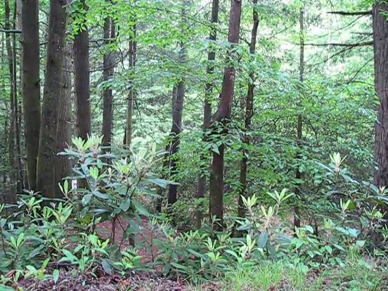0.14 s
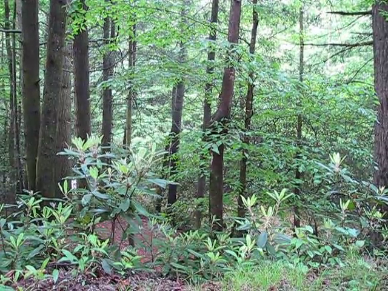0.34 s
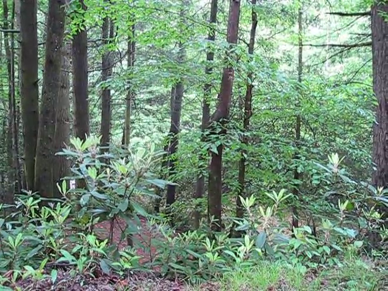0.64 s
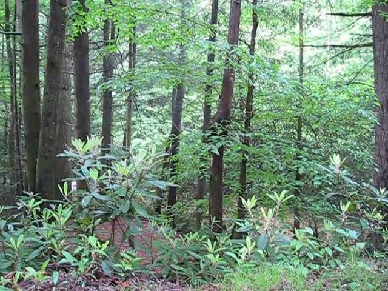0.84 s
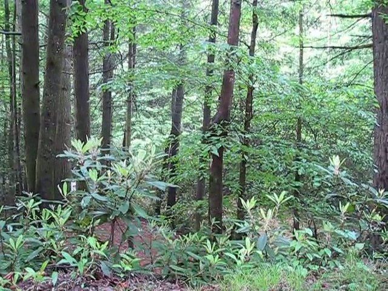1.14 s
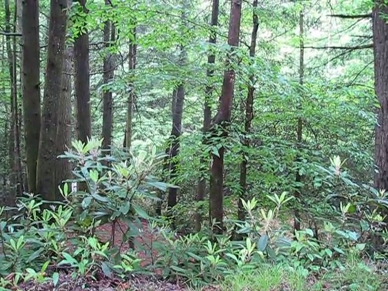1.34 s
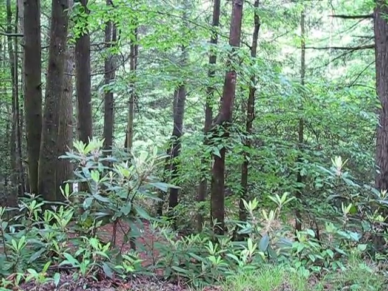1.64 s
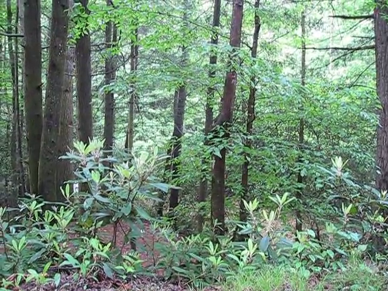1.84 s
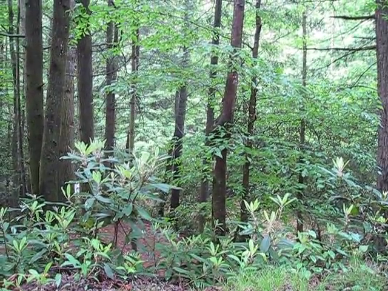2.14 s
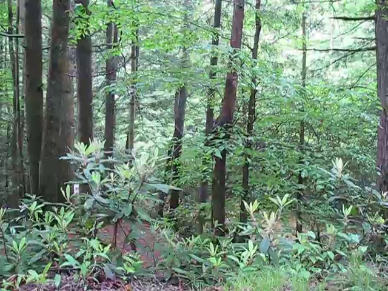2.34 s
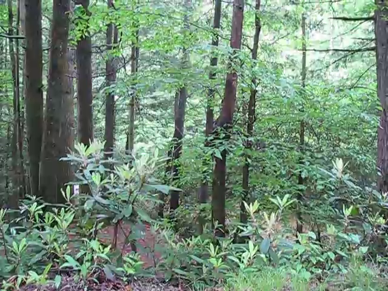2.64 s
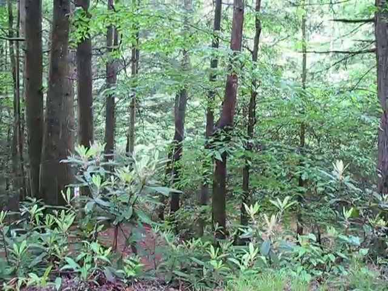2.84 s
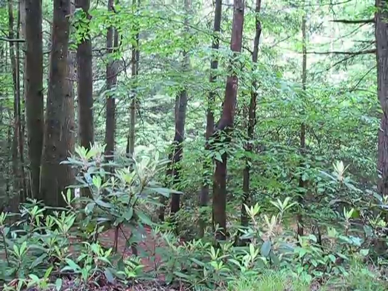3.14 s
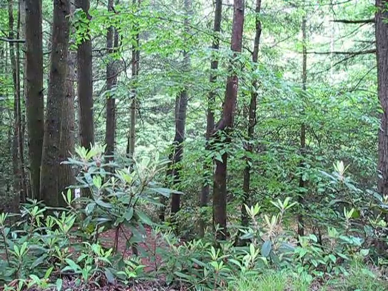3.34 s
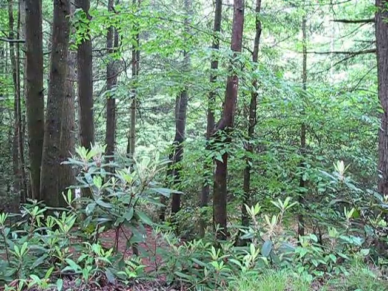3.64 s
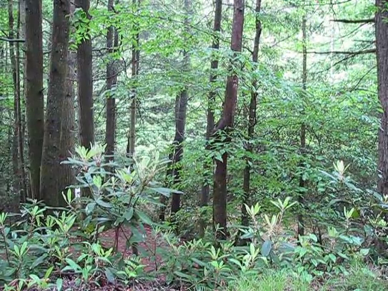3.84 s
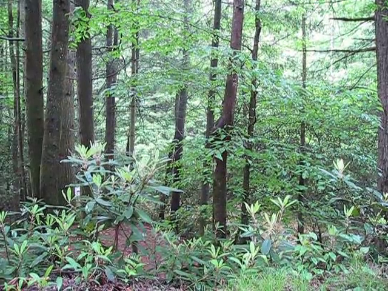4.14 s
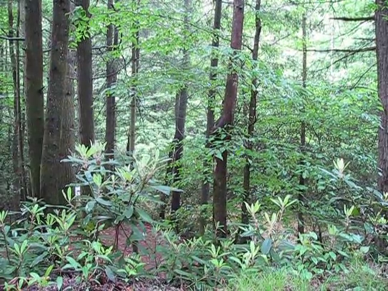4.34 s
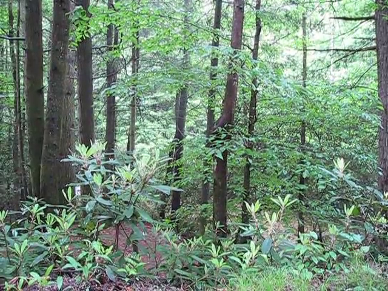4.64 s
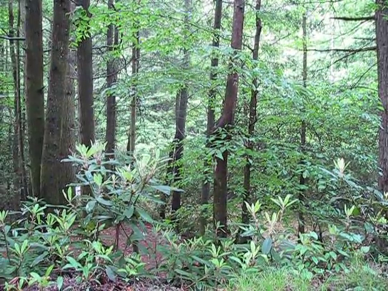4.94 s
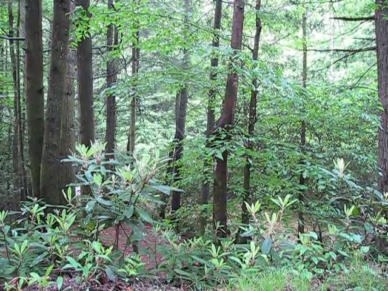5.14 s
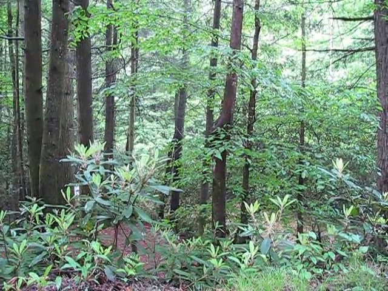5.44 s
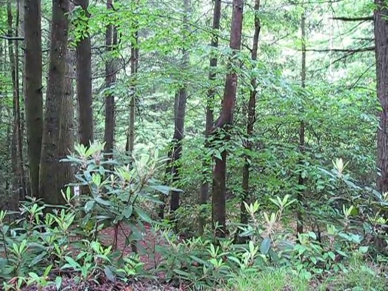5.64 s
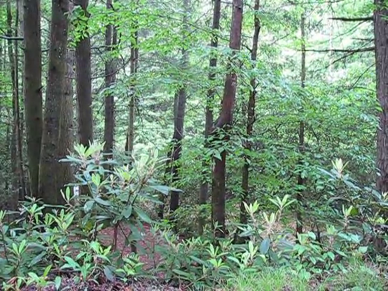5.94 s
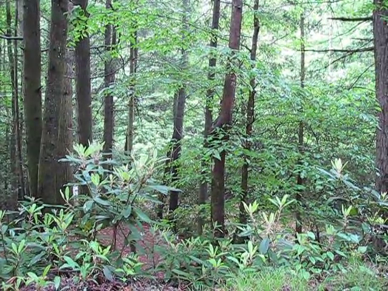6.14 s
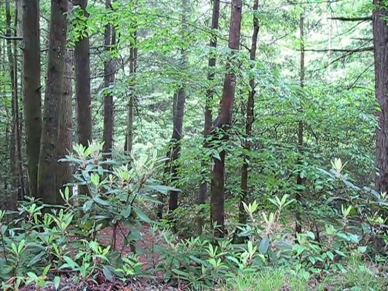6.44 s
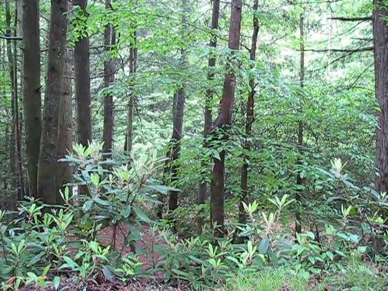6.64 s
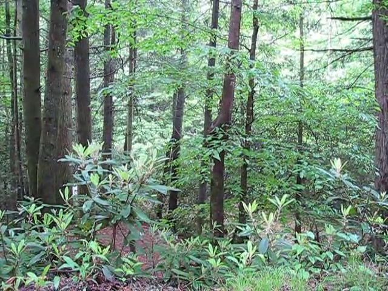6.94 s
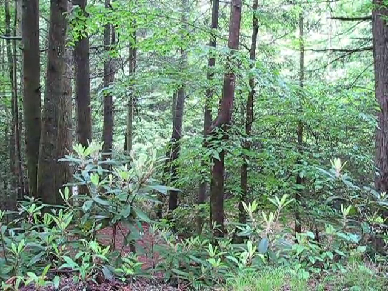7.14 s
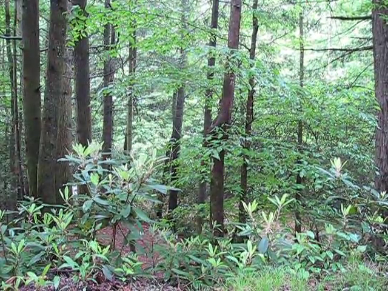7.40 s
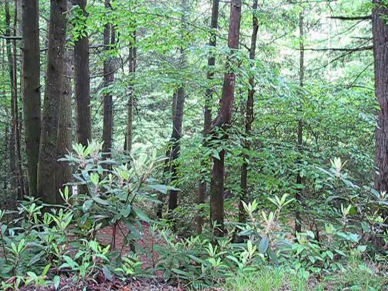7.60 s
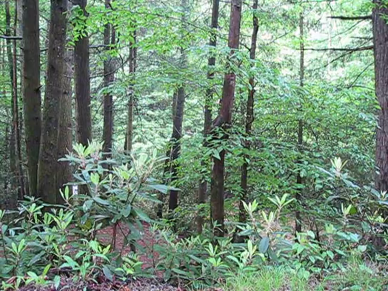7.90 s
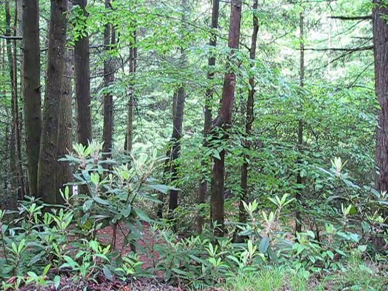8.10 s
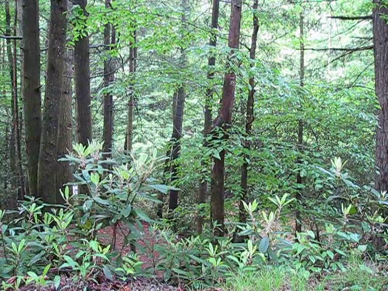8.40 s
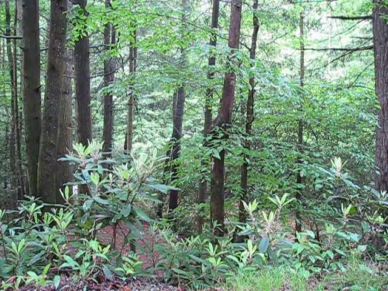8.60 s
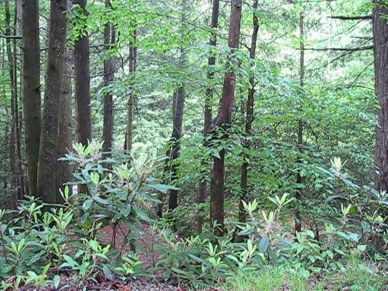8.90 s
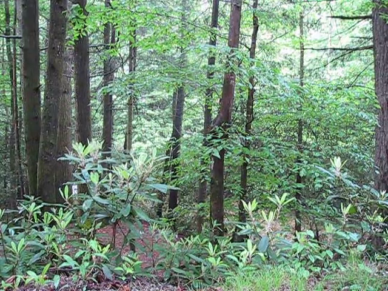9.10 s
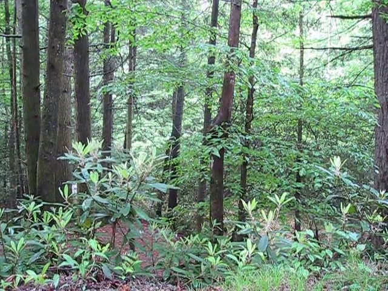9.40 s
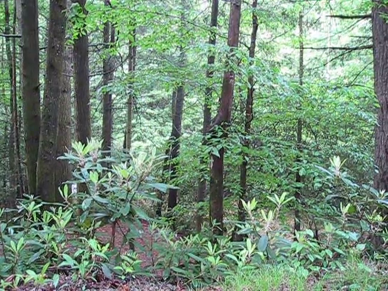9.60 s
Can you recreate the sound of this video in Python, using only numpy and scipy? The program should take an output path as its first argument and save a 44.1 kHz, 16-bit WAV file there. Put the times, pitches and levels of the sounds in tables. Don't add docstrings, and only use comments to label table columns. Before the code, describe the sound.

Steady river rush in a forest, far birds whistling faintly, then a close warbler sings one bright slurred phrase ending in rapid chips.

```python
import sys
import numpy as np
from scipy import signal
from scipy.fft import rfft, irfft
from scipy.io import wavfile
from scipy.ndimage import uniform_filter1d

SR = 44100
rng = np.random.default_rng(int(sys.argv[2]) if len(sys.argv) > 2 else 0)


def gain_from_db(level_db):
    decades = np.asarray(level_db, float) / 20
    return 10 ** decades


def master_out(mix):
    frames = np.transpose(np.atleast_2d(mix))
    ceiling = np.clip(frames, -1, 1)
    pcm = np.round(ceiling * 32767).astype(np.int16)
    wavfile.write(sys.argv[1], SR, pcm)


N = 430416


def walk(rate_hz):
    hold = int(SR / rate_hz)
    steps = np.repeat(rng.standard_normal(N // hold + 1), hold)
    return 0.85 * uniform_filter1d(uniform_filter1d(steps, hold), hold)[:N]


def noise(spectrum):
    hz = np.maximum(np.arange(N // 2 + 1) * SR / N, 1)
    at_hz, db = np.transpose(spectrum)
    colour = gain_from_db(np.interp(np.log(hz), np.log(at_hz), db))
    return hz, rfft(rng.standard_normal(N)) * colour


# f/Hz, level/dB per Hz
RIVER_COLOUR = [(30, -35), (90, -30), (280, -15), (660, -6.5), (1270, -9.5), (1750, -6.5), (3000, -4.5),
                (3700, 0), (4400, -8), (7200, -21), (8400, -23.5), (9500, -35.5), (12500, -39),
                (14800, -58)]
# t/s, level/dB
RIVER_FLOW = [
    (0.0, -37.5),
    (0.2, -38),
    (0.87, -37.5),
    (2.22, -38),
    (7.05, -38),
    (7.3, -38),
]


def river():
    hz, rush = noise(RIVER_COLOUR)
    splash_db = .6 * walk(120) + .25 * walk(8)
    out = 0
    for centre_hz in 30 * 2. ** np.arange(10):
        octaves_away = np.clip(np.log2(hz / centre_hz), -1, 1)
        band = np.cos(np.pi / 2 * octaves_away) ** 2
        swell_db = .3 * walk(3) + .45 * walk(14)
        out = out + irfft(rush * band, N) * gain_from_db(splash_db + swell_db)
    flow_db = np.interp(np.arange(N) / SR, *np.transpose(RIVER_FLOW))
    river_over_mid_db = 11.5
    return out / np.std(out) * gain_from_db(flow_db + river_over_mid_db)


# deepest from t/s, hold t/s, depth level/dB
GAIN_BITES = [
    (7.542, .005, 5),
    (7.744, 0.035, 6.5),
    (7.987, 0.044, 6.5),
    (8.223, .015, 3.5),
]


def recorder_gain_db():
    t = np.arange(N) / SR
    bite_s, let_go_s = .04, 0.08
    pulled_db = 0
    for start, hold, depth_db in GAIN_BITES:
        biting = 1 + (t - start) / bite_s
        letting_go = 1 - (t - start - hold) / let_go_s
        pulled_db = pulled_db + depth_db * np.clip(np.minimum(biting, letting_go), 0, 1)
    return -pulled_db


def shape(rows, bend, swell_db, peak, fade_db):
    u = np.linspace(0, 1, num=17)
    slide = (1 - np.exp(-bend * u)) / (1 - np.exp(-bend))
    before_peak = np.clip(1 - u / peak, 0, 1)
    after_peak = np.clip((u - peak) / (1 - peak), 0, 1)
    breath_db = -swell_db * before_peak ** 2 - fade_db * after_peak ** 2
    notes = []
    for row in rows:
        start, length, from_hz = row[:3]
        to_hz, level_db = row[-2:]
        hz = from_hz + (to_hz - from_hz) * slide
        notes.append(np.transpose([start + length * u, hz, level_db + breath_db]))
    return notes


def sing(notes, edge_s, flutter_db, flutter_hz, wobble):
    out = np.zeros(N)
    flutter = gain_from_db(flutter_db * walk(flutter_hz))
    waver = 1 + wobble * walk(90)
    for note in notes:
        s, hz, db = np.transpose(note)
        at = np.arange(max(int((s[0] - edge_s) * SR), 0), int((s[-1] + edge_s) * SR))
        t = at / SR
        edges = np.clip(np.minimum(t - s[0], s[-1] - t) / edge_s + .5, 0, 1)
        phase = 2 * np.pi * np.cumsum(np.interp(t, s, hz) * waver[at]) / SR
        out[at] += np.sqrt(2) * gain_from_db(np.interp(t, s, db)) * edges ** 2 * np.sin(phase)
    return out * flutter * gain_from_db(-recorder_gain_db())


def trunks(x, direct_db, near_db, far_db, t60_s, leaves_ms):
    t = np.arange(SR) / SR
    cluster = rng.standard_normal(SR) * gain_from_db(-60 * t / .16) * (t > .002)
    wash_db = 2 * walk(60)[:SR] - 60 * t / t60_s
    wash = rng.standard_normal(SR) * gain_from_db(wash_db) * np.clip(t / .03, 0, 1)
    echoes = gain_from_db(near_db) * cluster / np.sqrt(np.sum(cluster ** 2))
    echoes = echoes + gain_from_db(far_db) * wash / np.sqrt(np.sum(wash ** 2))
    at = np.arange(N)
    blurred = np.interp(at + leaves_ms / 1000 * SR * walk(300), at, x)
    return gain_from_db(direct_db) * x + signal.fftconvolve(blurred, echoes)[:N]


# start t/s, length t/s, f/Hz, level/dB
LOW_NOTES = [(0, .1, 3880, -26), (.115, .075, 3870, -22), (.21, .085, 3875, -32), (3.3, 0.26, 3916, -35),
             (3.552, .085, 3860, -21.5), (3.65, .095, 3895, -23), (3.755, 0.061, 3830, -25.5),
             (3.815, 0.14, 3865, -33.5), (7.31, 0.15, 3885, -29), (7.422, 0.15, 3896, -29.5),
             (7.65, 0.068, 3930, -32), (7.85, 0.17, 3985, -32)]
# start t/s, length t/s, f/Hz, level/dB
LOW_REPLIES = [
    (0.551, 0.026, 3350, -25.5),
    (.628, 0.027, 3365, -29),
    (4.206, 0.15, 3436, -29),
    (4.35, .13, 3384, -30.5),
    (7.869, .11, 3395, -33),
    (8.006, 0.089, 3390, -35),
]


def low_whistler():
    notes = shape(LOW_NOTES + LOW_REPLIES, bend=1, swell_db=6, peak=.3, fade_db=6)
    song = sing(notes, edge_s=.016, flutter_db=2.6, flutter_hz=35, wobble=.0015)
    return trunks(song, direct_db=0, near_db=-14, far_db=-13, t60_s=1., leaves_ms=.02)


# start t/s, length t/s, from f/Hz, to f/Hz, level/dB
DISTANT_SCRAPS = [(0, 0.12, 3560, 3500, -26), (.335, .04, 3650, 3940, -22), (1.3, .12, 2800, 3020, -31),
                  (1.36, 0.038, 3770, 3600, -21), (2.25, .08, 4900, 4500, -32),
                  (2.36, .11, 3500, 4250, -23), (2.49, 0.086, 3840, 2770, -28.5),
                  (3.97, 0.062, 3630, 3516, -25), (5.44, .07, 3960, 4800, -40),
                  (5.52, .04, 3530, 2940, -30), (5.58, .05, 3700, 4100, -32)]


def distant_warbler():
    notes = shape(DISTANT_SCRAPS, bend=.6, swell_db=1.5, peak=.4, fade_db=2.5)
    song = sing(notes, edge_s=.015, flutter_db=4, flutter_hz=60, wobble=.008)
    return trunks(song, direct_db=-13, near_db=-9, far_db=-9, t60_s=.6, leaves_ms=.07)


# start t/s, length t/s, from f/Hz, to f/Hz, level/dB
HIGH_NOTES = [(.31, 0.19, 6370, 6140, -34), (3.0, 0.18, 6800, 6500, -43.5), (3.26, 0.31, 6650, 6300, -41.5),
              (3.65, .24, 6730, 6530, -43), (3.915, .27, 6400, 6100, -35), (7.02, .28, 6830, 6400, -41.5),
              (7.36, .14, 6900, 6400, -43), (7.635, .11, 6400, 6260, -35.5), (7.8, 0.093, 6170, 6200, -38),
              (7.815, 0.037, 5780, 5780, -33), (8.08, .11, 6570, 6530, -43),
              (8.27, 0.041, 6430, 6530, -48.5)]


def high_singer():
    notes = shape(HIGH_NOTES, bend=3, swell_db=2.5, peak=.3, fade_db=3)
    song = sing(notes, edge_s=.02, flutter_db=3.5, flutter_hz=60, wobble=0.00685)
    return trunks(song, direct_db=-3.5, near_db=-8, far_db=-3.0, t60_s=1.05, leaves_ms=0.029)


# start t/s, length t/s, from f/Hz, to f/Hz, level/dB
SLURS_LEVELLING = [
    (6.878, .058, 5100, 5020, -33),
    (7.686, 0.081, 5080, 4600, -14.5),
    (7.768, 0.045, 4580, 5220, -20.5),
    (7.82, .115, 5130, 5285, -24.5),
    (7.945, .105, 4986, 4127, -15),
]
FIRST_WHISTLE = [
    (7.083, .16, 6090, 4826, -16.5),
]
SECOND_WHISTLE = [
    (7.386, .185, 6105, 4710, -16.5),
]
FALLING_HOOKS = [
    (8.352, 0.0592, 4000, 3340, -17.5),
    (8.583, .018, 6840, 4840, -19.5),
]
CLOSING_CHIPS = [
    (8.501, 0.015, 3980, 3980, -11),
    (8.529, 0.013, 4020, 3860, -15),
    (8.545, .014, 3860, 3650, -16.5),
    (8.559, .022, 3980, 3890, -18),
    (8.601, 0.037, 4890, 4980, -20),
    (8.642, .016, 4900, 3950, -26),
]


def near_warbler():
    slurs = (shape(FIRST_WHISTLE, bend=.6, swell_db=14, peak=0.95, fade_db=12)
             + shape(SECOND_WHISTLE, bend=1.2, swell_db=17, peak=0.24, fade_db=3.5)
             + shape(SLURS_LEVELLING, bend=1.22, swell_db=-3.0, peak=.2, fade_db=2))
    chips = (shape(FALLING_HOOKS, bend=3, swell_db=4, peak=.85, fade_db=.6)
             + shape(CLOSING_CHIPS, bend=.2, swell_db=.6, peak=.1, fade_db=4))
    song = sing(slurs + chips, edge_s=.004, flutter_db=3, flutter_hz=130, wobble=0.0034)
    return trunks(song, direct_db=-1.9, near_db=-4, far_db=-2.4, t60_s=0.93, leaves_ms=0.036)


# start t/s, length t/s, from f/Hz, to f/Hz, level/dB
CLIMB = [
    (8.123, 0.03, 3383, 3455, -16),
    (8.157, .065, 3583, 4160, -14.5),
    (8.222, .045, 4180, 4950, -19.5),
]
LAST_FLICKS = [
    (8.62, 0.0364, 3000, 2650, -32),
    (8.66, 0.0394, 3900, 3350, -27),
    (8.739, .009, 3720, 5400, -17.5),
    (8.746, 0.0099, 3800, 5640, -19.5),
    (8.756, 0.007, 5580, 6770, -34),
    (8.774, .003, 3480, 5000, -20),
]


def turned_warbler():
    notes = (shape(CLIMB, bend=0.18, swell_db=.6, peak=.2, fade_db=0.5)
             + shape(LAST_FLICKS, bend=0.092, swell_db=1.0, peak=.3, fade_db=5))
    song = sing(notes, edge_s=.003, flutter_db=1.8, flutter_hz=130, wobble=.003)
    return trunks(song, direct_db=-1.5, near_db=-6, far_db=-.5, t60_s=1.1, leaves_ms=.06)


def scene():
    far_birds = low_whistler() + distant_warbler() + high_singer()
    return (river() + far_birds + near_warbler() + turned_warbler())[None]


def top_cut(x):
    return signal.sosfilt(signal.butter(12, 17100, fs=SR, output="sos"), x)


# f/Hz, level/dB per Hz
CIRCUIT_COLOUR = [(30, -6), (150, -10), (1000, -19), (12000, -20), (17000, -25.5)]


def record(dry):
    circuit = irfft(noise(CIRCUIT_COLOUR)[1], N)
    circuit_db = -60.5
    bent = dry + .003 * dry ** 2 - .012 * dry ** 3
    ducked = bent * gain_from_db(recorder_gain_db())
    noisy = ducked + circuit / np.std(circuit) * gain_from_db(circuit_db)
    notch_hz, notch_width_hz = 7880, 700
    b, a = signal.iirnotch(notch_hz, notch_hz / notch_width_hz, fs=SR)
    finished = signal.lfilter(b, a, noisy)
    return top_cut(finished)


dry = scene()
out = record(dry)
master_out(out)
```